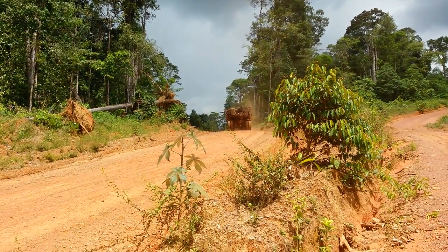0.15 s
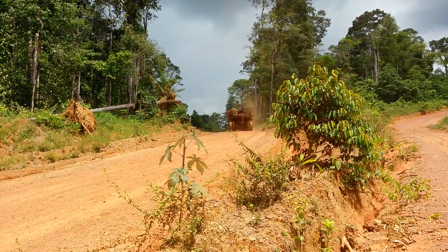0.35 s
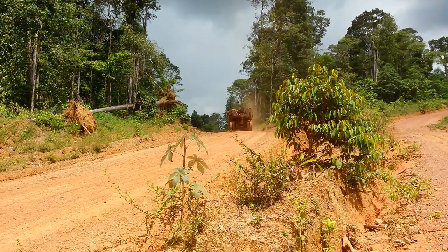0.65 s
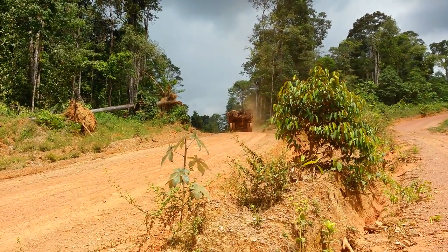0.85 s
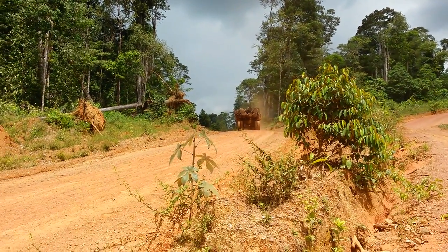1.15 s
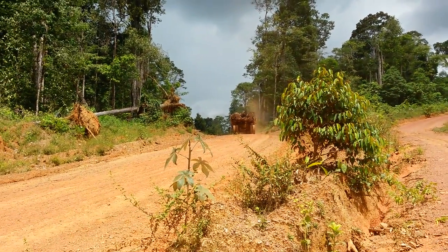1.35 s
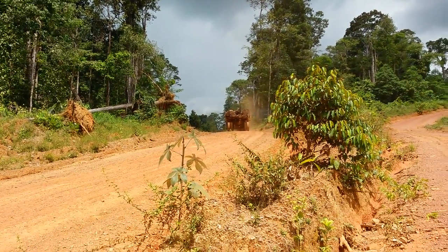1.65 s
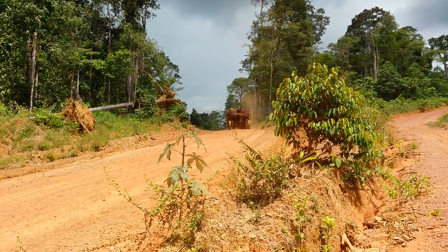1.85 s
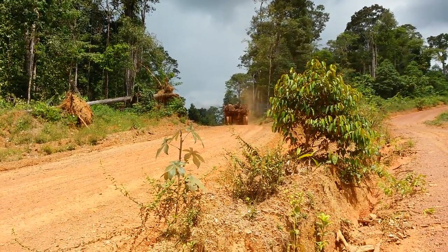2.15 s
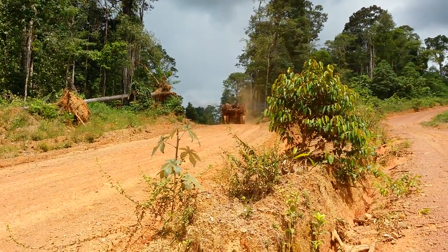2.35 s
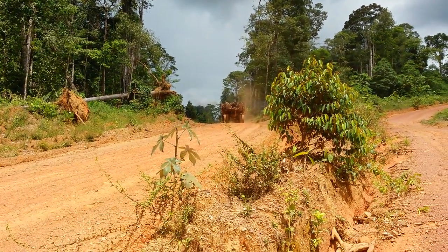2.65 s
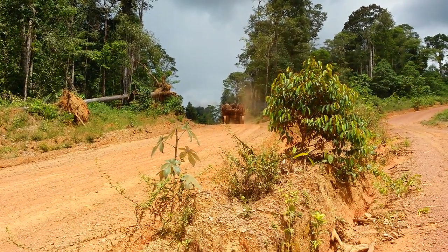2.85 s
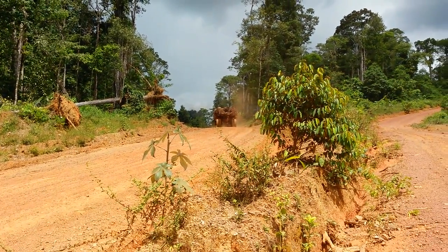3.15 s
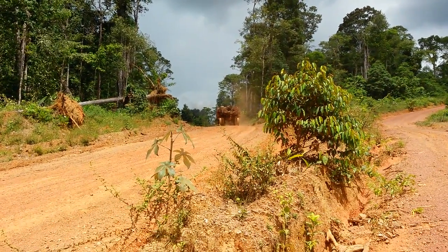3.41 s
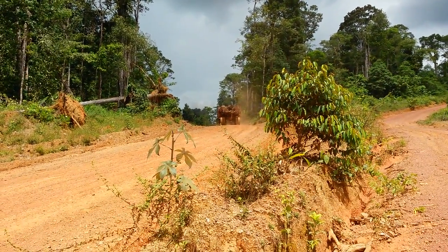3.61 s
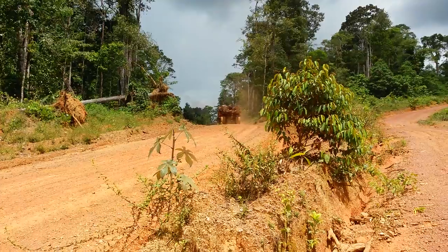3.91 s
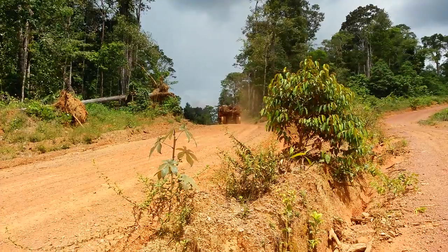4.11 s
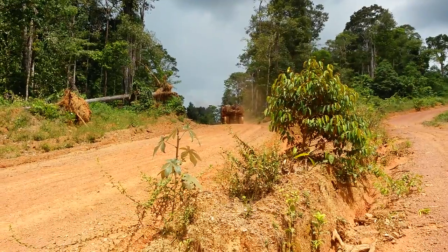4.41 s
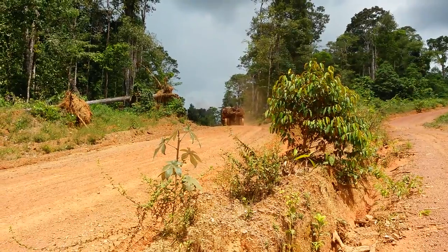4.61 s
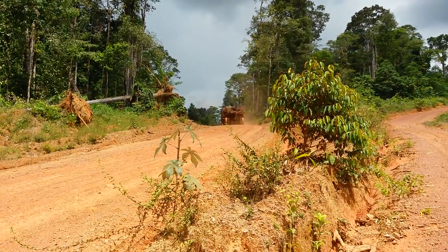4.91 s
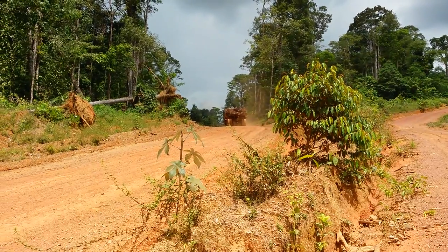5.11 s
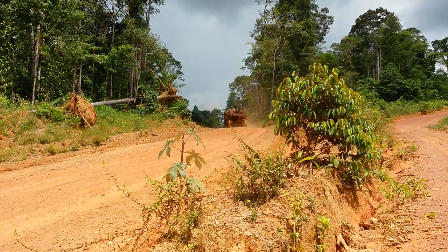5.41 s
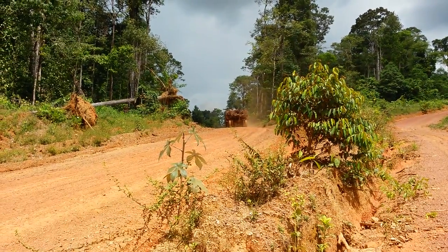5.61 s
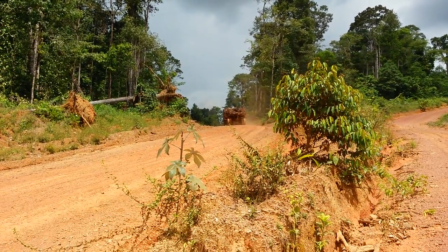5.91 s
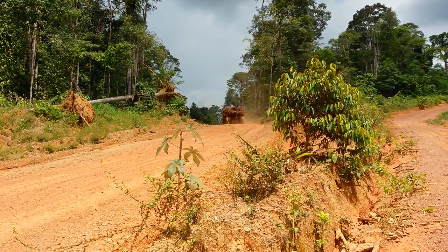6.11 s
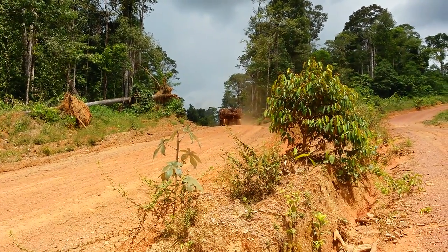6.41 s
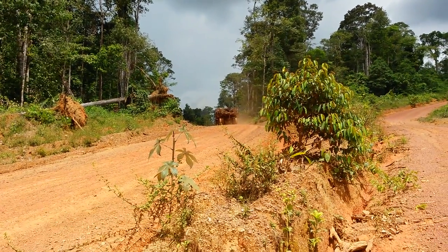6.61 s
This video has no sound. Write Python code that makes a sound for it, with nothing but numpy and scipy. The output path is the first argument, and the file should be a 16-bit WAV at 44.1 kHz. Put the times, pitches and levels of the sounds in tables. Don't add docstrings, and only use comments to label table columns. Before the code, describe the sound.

A heavy diesel truck works its way up a dirt road among trees. Its thumping exhaust rises in pitch under load, with a breathy whistle from the stack. Around four seconds the driver lifts, revs sink, compressed air puffs out, and the next gear pulls. Outdoor stereo from the roadside, with faint forest reflections.

```python
import sys
import numpy as np
from scipy import signal
from scipy.fft import rfft, irfft, next_fast_len
from scipy.io import wavfile
from scipy.ndimage import map_coordinates

SR = 44100
rng = np.random.default_rng(int(sys.argv[2]) if len(sys.argv) > 2 else 0)


def magnitude_from_level(level_db):
    exponent = np.asarray(level_db, float) / 20
    return 10 ** exponent


def transcribe(u):
    v = np.clip(np.atleast_2d(u).T, -1, 1)
    q = np.round(v * 32767).astype(np.int16)
    wavfile.write(sys.argv[1], SR, q)


N = 298094


def unit(x):
    return x / np.sqrt(np.mean(x ** 2) + 1e-20)


def along(points, hz):
    f, v = np.transpose(points)
    return np.interp(np.log(hz + 1), np.log(f + 1), v)


def curves(rows):
    s, *cols = np.transpose(rows)
    return [np.interp(np.arange(N) / SR, s, c) for c in cols]


def wobble(rate_hz):
    coarse = np.arange(0, N + 64, 64)
    knots = rng.standard_normal(int(N * rate_hz / SR) + 4)
    return np.interp(np.arange(N), coarse, map_coordinates(knots, [coarse * rate_hz / SR]))


def filtered(x, response):
    m = next_fast_len(x.shape[-1] + 8192)
    hz = np.fft.rfftfreq(m, 1 / SR)
    return irfft(rfft(x, m) * response(hz), m)[..., :x.shape[-1]]


# f/Hz, correlation/1
LIKENESS = [(25, .8), (50, 0.86), (300, 0.98), (600, 0.89), (900, 0.61), (1300, 0.68), (1650, 0.41),
            (2100, -0.093), (3500, 0.41), (5500, 0.095), (13000, -0.13)]


def spread(pair, gain):
    def mid_side(hz):
        turn = np.arccos(np.clip(along(LIKENESS, hz), -1, 1)) / 2
        return gain(hz) * [np.cos(turn), np.sin(turn)]
    mid, side = filtered(pair, mid_side)
    return np.array([mid + side, mid - side])


def rush(spectrum):
    return unit(spread(rng.standard_normal((2, N)), lambda hz: magnitude_from_level(along(spectrum, hz))))


# t/s, cycle rate f/Hz
ENGINE_SPEED = [(0, 14.2), (.3, 13.7), (.5, 14.2), (.9, 14.67), (1.05, 15.09), (1.4, 16.95), (1.8, 17.9),
                (2.25, 19.26), (3, 19.8), (3.92, 19.67), (4.05, 19.09), (4.3, 17.2), (4.95, 13.8),
                (5.25, 13.87), (5.65, 13.5), (6, 14.89), (6.3, 15.84), (6.76, 16.95)]
# t/s, flow level/dB re full load, lowest stack whistle f/Hz
GAS_LOAD = [(0, -9.5, 1088), (.2, -10, 1094), (.45, -2.5, 1193), (.7, -0.4, 1285), (1, 0.6, 1325),
            (1.6, 1, 1335), (2.3, 2.15, 1350), (2.6, 1, 1304), (3, -0.2, 1247), (3.97, 0.5, 1245),
            (4.15, -3, 1108), (4.6, -7, 1086), (4.9, -13, 1086), (5.1, -10, 1082), (5.3, -3, 1172),
            (5.6, -0.8, 1271), (6.1, -0.4, 1317), (6.76, 1, 1328)]


def drive():
    speed_hz, = curves(ENGINE_SPEED)
    flow_db, whistle_hz = curves(GAS_LOAD)
    hot_hz = 1340
    return speed_hz, flow_db, whistle_hz / hot_hz


def order_tone(order, cycle, db):
    scatter, drift = .02, .025
    phase = order * cycle + scatter * order * rng.random() + drift * wobble(9.4)
    return magnitude_from_level(db + 1.5) * np.cos(2 * np.pi * phase)


# order/1 (5 = firing), hot f/Hz, width/Hz, peak level/dB, off-resonance level/dB
SILENCER = [(5, 96.9, 13, -27, -38.5), (8, 112.4, 26, -34.5, -49.5), (10, 140.1, 20.5, -27.5, -41.5),
            (16, 319, 67, -31.5, -75)]


def strong_orders(speed_hz, cycle, heat, flow_db):
    warms = (0.51, 0.33, 0.49, 0.034)
    grows = 1.12
    total = 0
    for (order, hot_hz, width_hz, peak_db, off_db), warm in zip(SILENCER, warms):
        offset_hz = order * speed_hz - hot_hz * heat ** warm
        near = 1 / (1 + (2 * offset_hz / width_hz) ** 2)
        boom_db = grows * flow_db + 20 * np.log10(magnitude_from_level(peak_db) * near + magnitude_from_level(off_db))
        total = total + order_tone(order, cycle, boom_db + .8 * wobble(10))
    return total


# order/1, level/dB re rumble
UNEVEN_ORDERS = [(2, -13), (3, -3.5), (4, -7), (6, -10), (7, -4), (9, -13), (11, -14.5), (12, -11.5),
                 (13, -19.5), (14, -12.5), (15, -10.5), (17, -6), (18, -12), (20, -15), (22, -35),
                 (24, -20), (25, -16), (26, -15.5), (28, -17.5), (30, -24.5), (32, -16.5)]
# f/Hz, level/dB
PIPE_GAIN = [(40, -11.5), (60, -20), (80, -4), (108, 3.5), (125, -5), (140, -3.5), (155, -46), (180, 12),
             (210, -11.5), (260, 1.5), (320, 0.5), (500, 2.5)]


def weak_orders(speed_hz, cycle, rumble_db):
    total = 0
    for order, db in UNEVEN_ORDERS:
        pipe_db = along(PIPE_GAIN, order * speed_hz)
        total = total + order_tone(order, cycle, rumble_db + db + pipe_db + 2.2 * wobble(3))
    return total


def resonances(rows):
    def response(f):
        return sum(magnitude_from_level([[left_db], [right_db]]) * (1j * f * w / (c * c - f * f + 1j * f * w + 1e-9)) ** 2
                   for c, w, left_db, right_db in rows)
    return response


# f/Hz, width/Hz, left level/dB, right level/dB
STACK_MODES = [(1335, 50.3, -8.5, 1), (1428, 270, -11, -3.5), (1640, 164, -17, -2),
               (2340, 115, -22.5, -19.5), (2977, 203, -13.5, -15), (3626, 230, -17.5, -20.5),
               (3965, 70, -12, -15), (4834, 180, -16.5, -14)]
# f/Hz, width/Hz, left level/dB, right level/dB
BONNET_MODE = [(1345, 152, -14, -5.5)]


def stack(cycle, heat, flow_db):
    white = spread(rng.standard_normal((2, N + SR)), lambda hz: 1)
    position = np.cumsum(heat)

    def read(rows):
        return np.array([map_coordinates(side, [position]) for side in filtered(white, resonances(rows))])

    still = filtered(spread(rng.standard_normal((2, N)), lambda hz: 1), resonances(BONNET_MODE))
    heated = magnitude_from_level(40 * (heat - 1)) * read(STACK_MODES[:1] + STACK_MODES[4:])
    gas = unit(heated + read(STACK_MODES[1:4]) + still)
    puffs = 1 + .12 * np.sin(2 * np.pi * 5 * cycle) + .05 * np.sin(2 * np.pi * cycle)
    return magnitude_from_level(-35.5 + flow_db + 1.5 + 0.81 * wobble(7)) * puffs * gas


# f/Hz, level/dB per Hz
RUMBLE_SPECTRUM = [(25, -25), (60, 3), (120, 7), (300, 2), (420, -4), (580, 0), (900, -7), (1500, -6.5),
                   (2200, -10), (3200, -16.5), (6000, -17)]


def rumble(cycle, rumble_db):
    chug = 1 + .1 * np.cos(2 * np.pi * cycle)
    return magnitude_from_level(rumble_db + 6.0 + 0.7 * wobble(6)) * chug * rush(RUMBLE_SPECTRUM)


# f/Hz, level/dB per Hz
HISS_SPECTRUM = [(800, -12), (2000, -23), (3200, -8.5), (5000, -6.5), (7000, -7), (9000, -3.5),
                 (11000, -3.5), (14000, -76)]


def hiss(heat, flow_db):
    grows, heat_db, fade_db_per_s = 0.25, 42, 0.4
    level_db = -39 + grows * flow_db + heat_db * (heat - 1) - fade_db_per_s * np.arange(N) / SR
    return magnitude_from_level(level_db + 5.5 + 0.45 * wobble(5)) * rush(HISS_SPECTRUM)


# peak t/s, level/dB, swell t/s, fade t/s
VALVE_PUFFS = [
    (.04, -29, 0.44, 0.15),
    (4.57, -37, 0.084, 0.17),
    (4.8, -31.5, 0.015, 0.035),
    (4.87, -26.5, 0.02, 0.048),
    (5.0, -32, 0.056, 0.039),
    (5.09, -32, 0.035, 0.054),
    (5.2, -43, .1, 0.11),
]
# f/Hz, level/dB per Hz
JET_SPECTRUM = [(1500, -60), (4000, -15), (7000, -10), (10000, -1), (14000, -1)]


def blowoff():
    t = np.arange(N) / SR
    puffs = 0
    for peak_s, db, swell_s, fade_s in VALVE_PUFFS:
        width_s = np.where(t < peak_s, swell_s, fade_s)
        puffs = puffs + magnitude_from_level(db) * np.exp(-((t - peak_s) / width_s) ** 2 / 2)
    return puffs * magnitude_from_level(wobble(20)) * rush(JET_SPECTRUM)


# f/Hz, t60 t/s
FOREST_DECAY = [(60, 0.44), (500, 0.87), (4000, 0.37)]


def forest(x):
    hz, t, z = signal.stft(rng.standard_normal((2, SR // 2)), SR, nperseg=256)
    decay = magnitude_from_level(-60 * t / along(FOREST_DECAY, hz)[:, None])
    tail = signal.istft(z * decay, SR, nperseg=256)[1]
    return signal.fftconvolve(x[None], tail / np.linalg.norm(tail[0]), axes=1)[:, :N]


# f/Hz, left minus right level/dB
SIDE_BALANCE = [(60, -2.5), (250, -3), (670, -3.5), (1200, -8), (2200, -6.5), (3200, -0.5), (5000, -7),
                (7000, -5.5), (9000, -1.5), (13000, -14.5)]


def lean(air):
    return filtered(air, lambda hz: magnitude_from_level(along(SIDE_BALANCE, hz) * [[.5], [-.5]]))


def scene():
    speed_hz, flow_db, heat = drive()
    cycle = np.cumsum(speed_hz) / SR
    rumble_db = -38.5 + 0.48 * flow_db + 0.33 * (speed_hz - 16)
    exhaust = strong_orders(speed_hz, cycle, heat, flow_db) + weak_orders(speed_hz, cycle, rumble_db)
    air = exhaust + magnitude_from_level(-17.5) * forest(exhaust)
    air = air + rumble(cycle, rumble_db) + hiss(heat, flow_db) + blowoff()
    return lean(air) + stack(cycle, heat, flow_db)


def low_pass(x):
    return signal.sosfilt(signal.butter(12, 14240, fs=SR, output="sos"), x)


# f/Hz, width/Hz, level/dB
MIC_PORTS = [(7270, 1620, 9), (8200, 1260, 10)]


def record(dry):
    c, w, db = np.transpose(MIC_PORTS)[:, :, None]
    late_s = np.array([[0], [2]]) / SR

    def port(f):
        ring = 1 + magnitude_from_level(db) / (1 + (2 * (f - c) / w) ** 2)
        shut = 1 + (f / (1.105 * c)) ** 8
        return ring / shut * np.exp(-2j * np.pi * f * late_s)

    return low_pass(filtered(dry, port))


dry = scene()
out = record(dry)
transcribe(out)
```